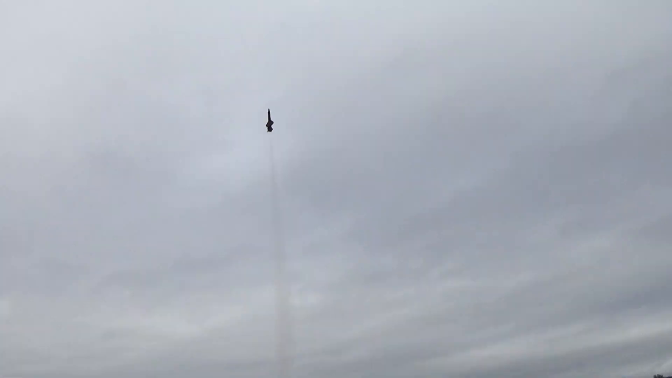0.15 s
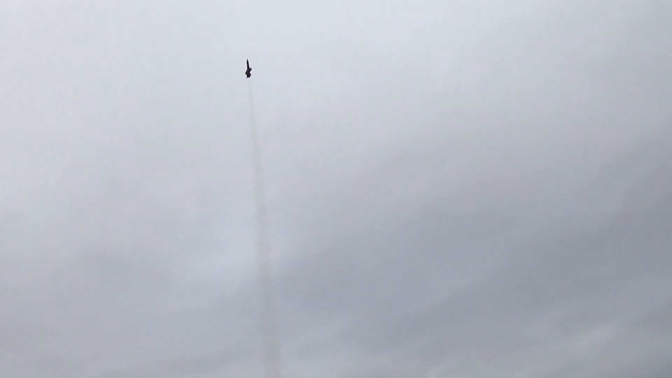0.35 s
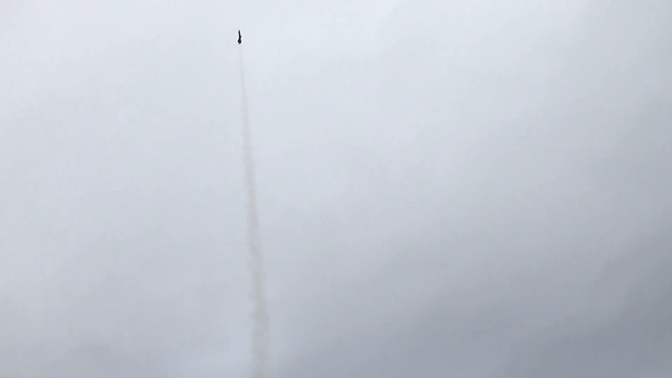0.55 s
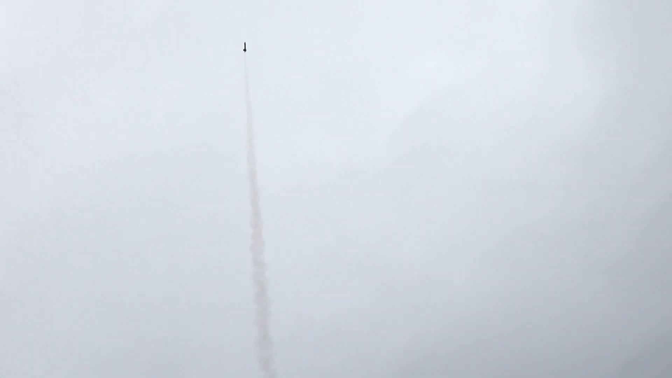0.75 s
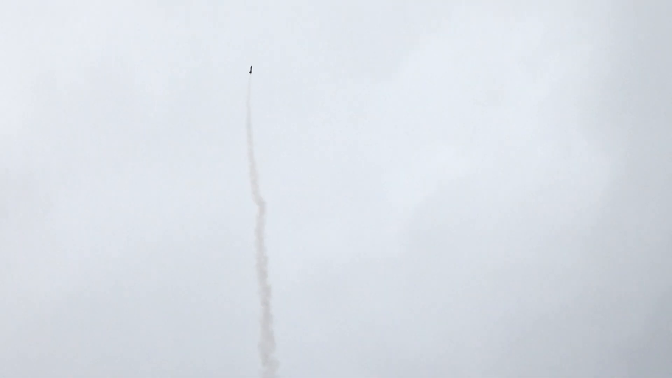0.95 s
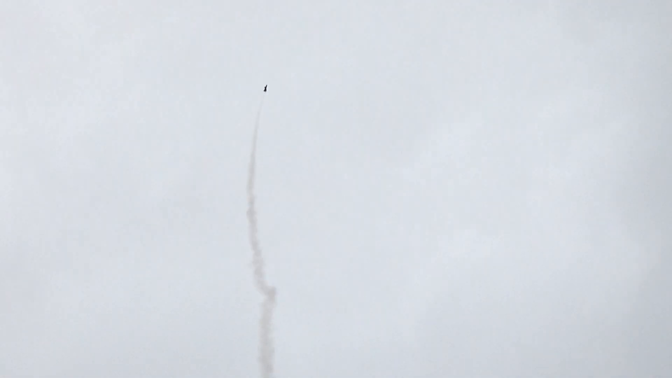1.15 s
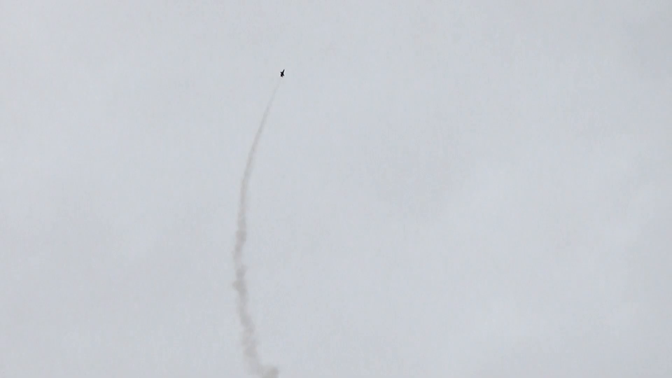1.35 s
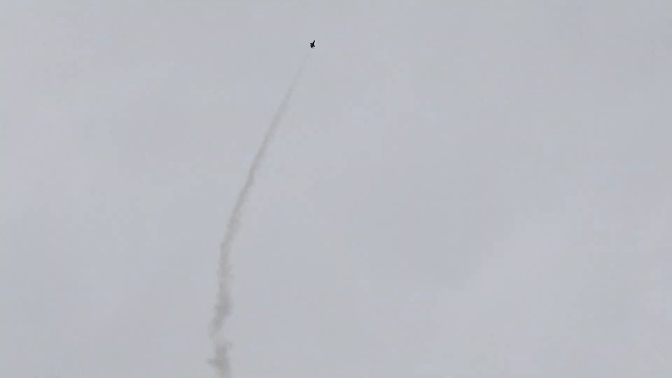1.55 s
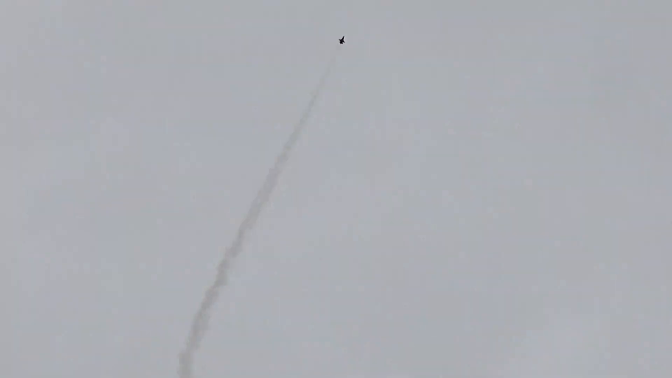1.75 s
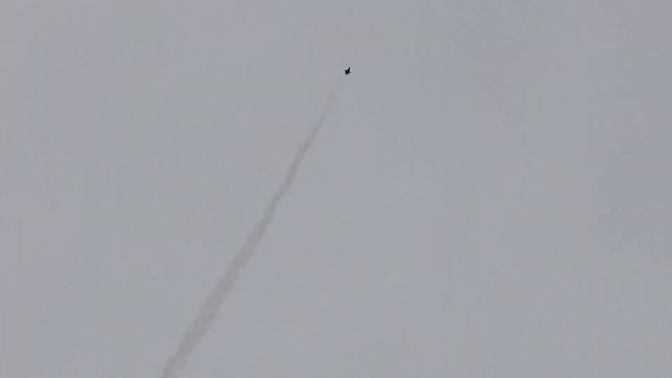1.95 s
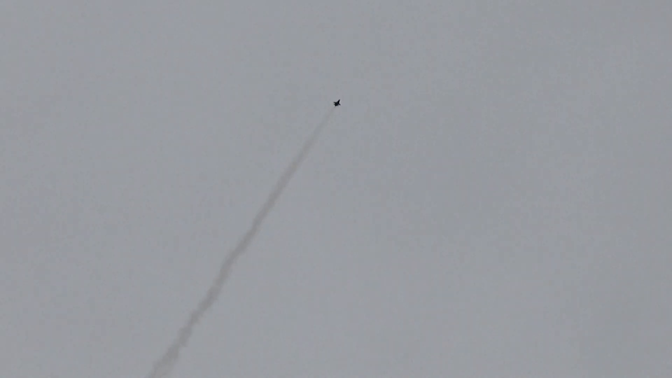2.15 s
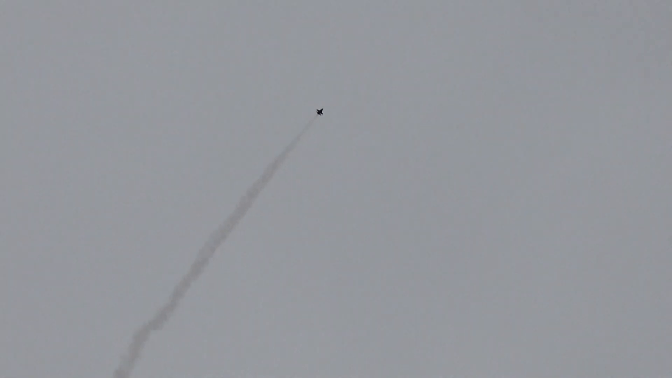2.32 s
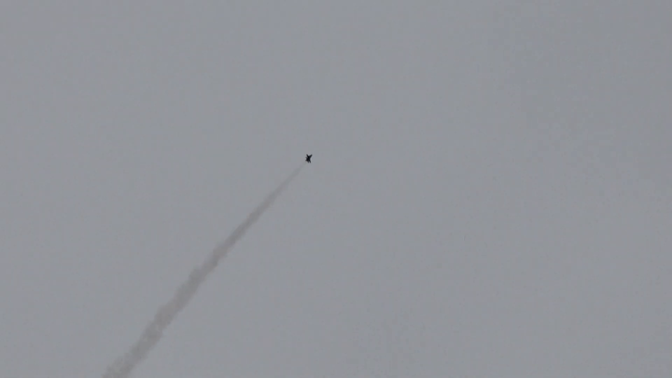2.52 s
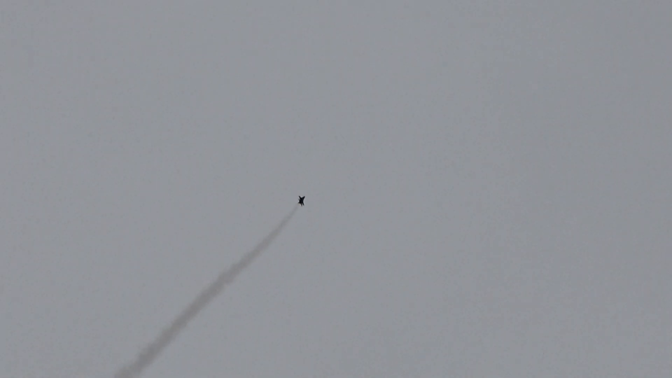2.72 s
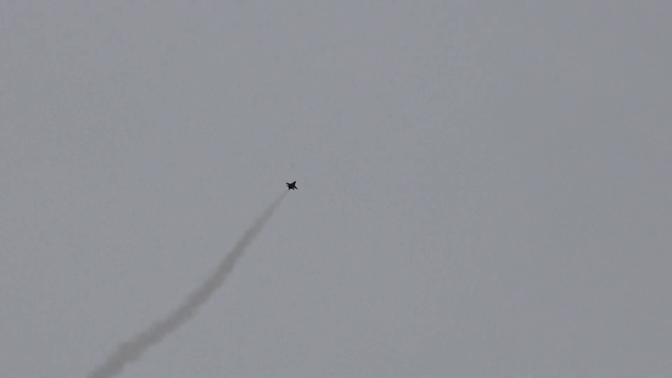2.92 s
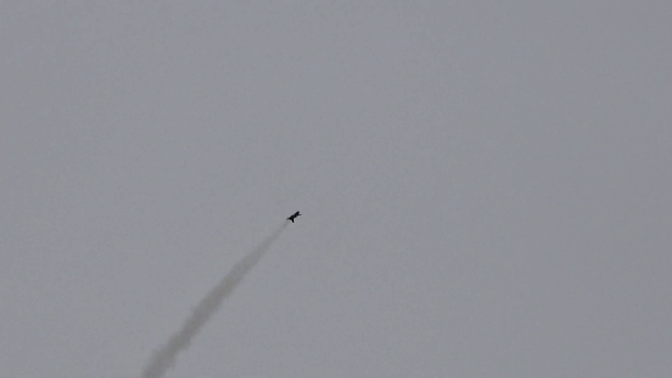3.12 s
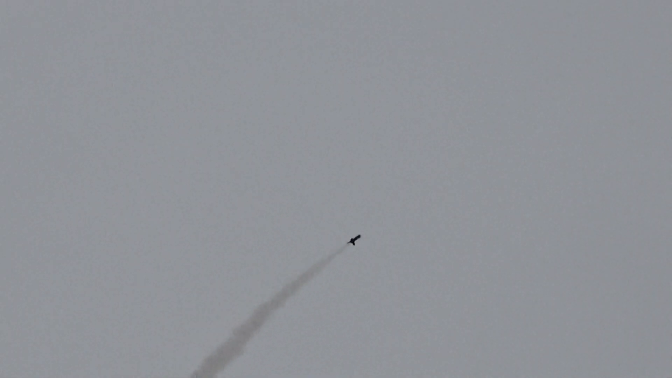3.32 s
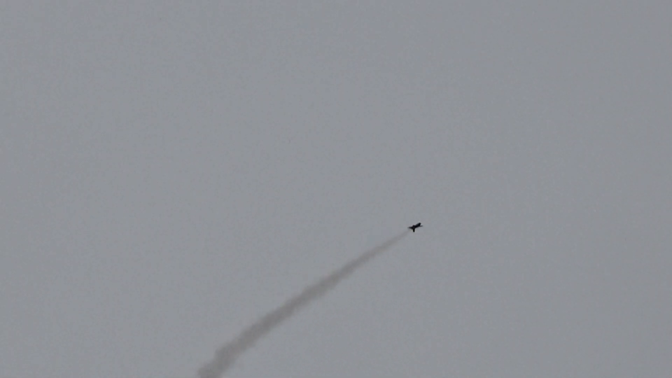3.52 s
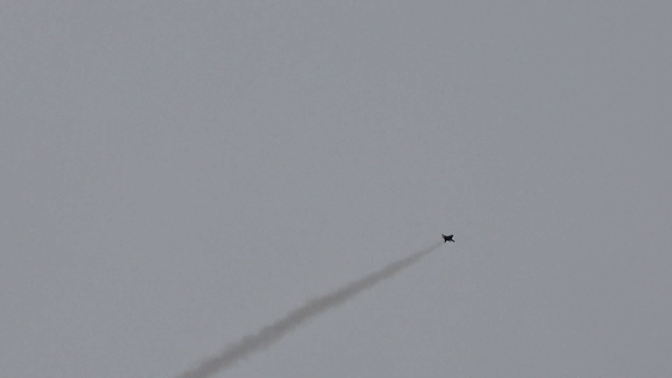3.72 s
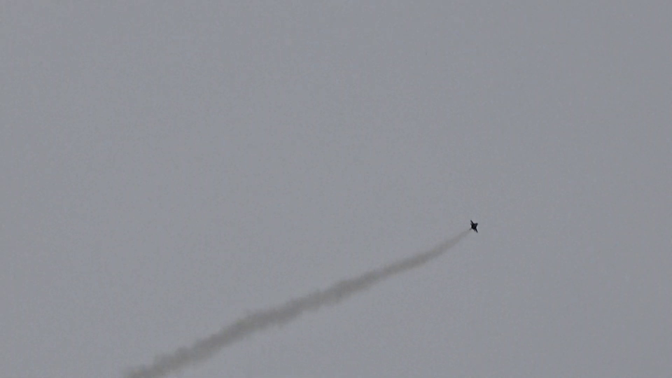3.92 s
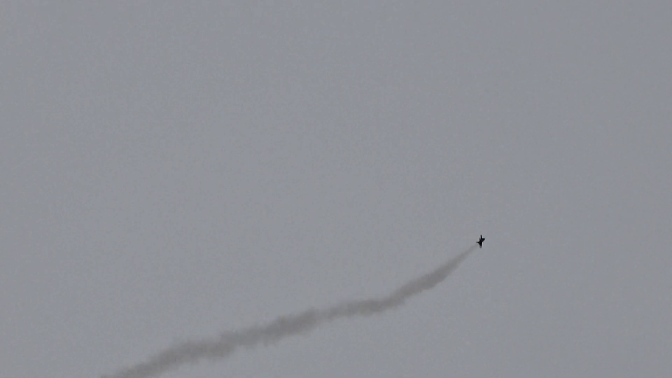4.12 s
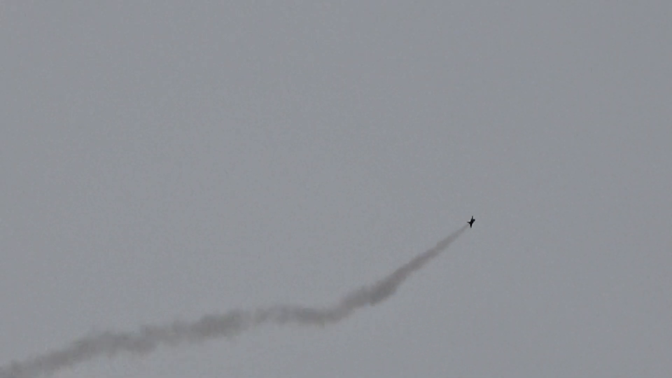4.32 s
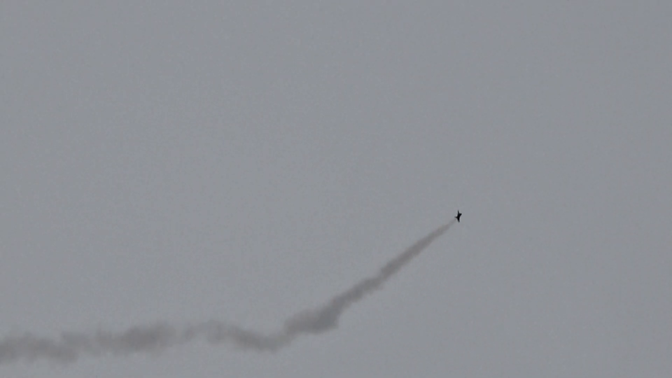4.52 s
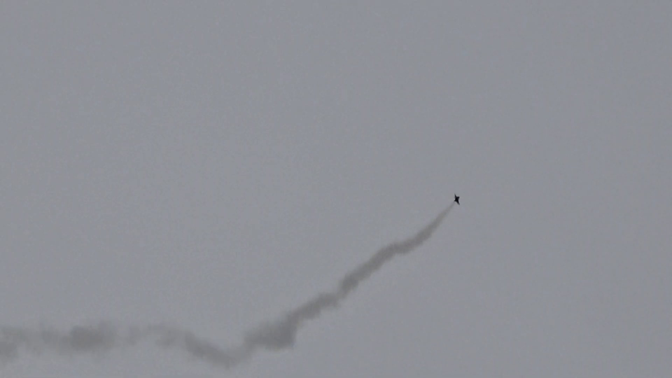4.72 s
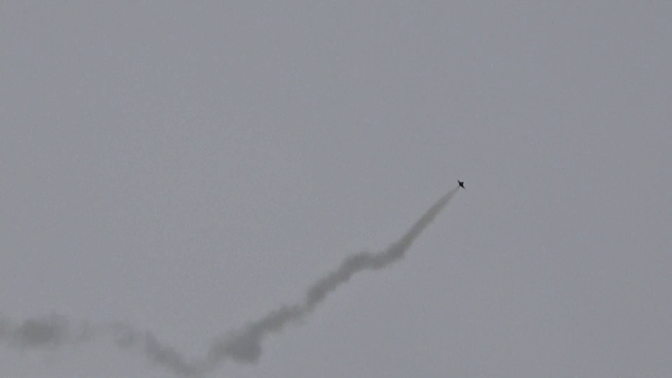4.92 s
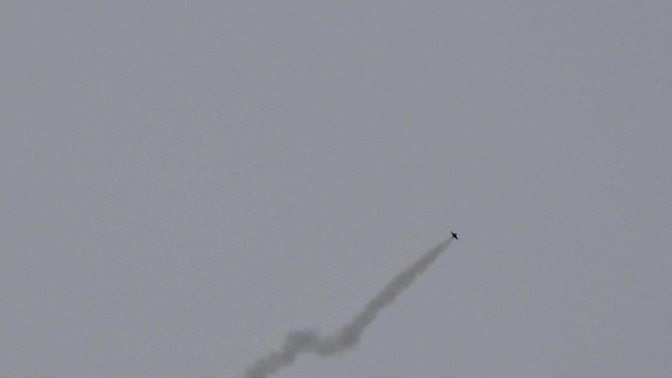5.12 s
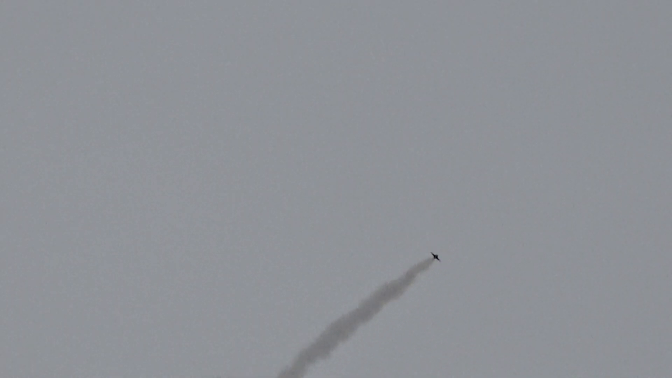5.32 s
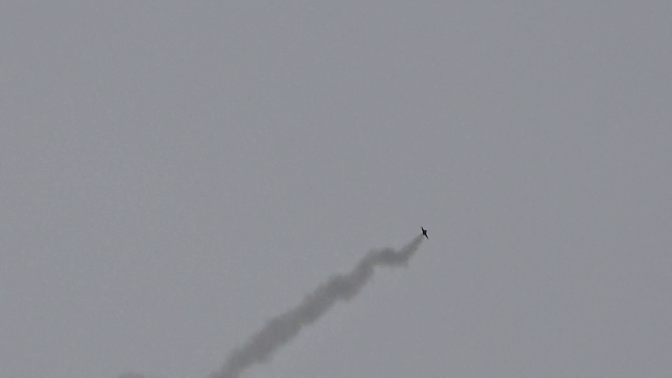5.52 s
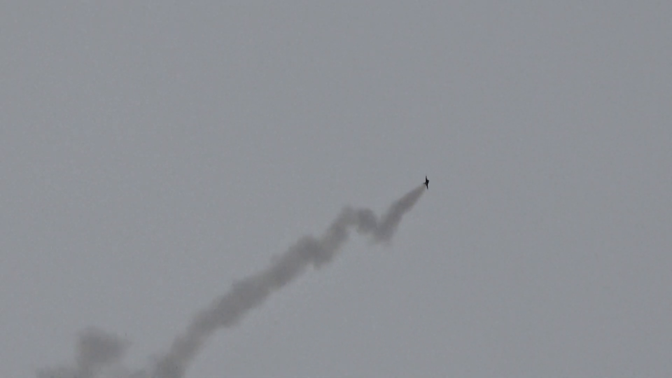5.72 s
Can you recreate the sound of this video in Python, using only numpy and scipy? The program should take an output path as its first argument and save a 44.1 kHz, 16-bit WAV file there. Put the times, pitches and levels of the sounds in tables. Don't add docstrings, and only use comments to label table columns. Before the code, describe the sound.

Throughout about 5.9 seconds, a small solid-fuel rocket motor hisses without pause as a winged model climbs away outdoors. At 0-1 s the hiss is bright, thin and sandy, with a close ground echo giving a slightly hollow, sliding tone. Sharp, dry crackles cluster around 1.3-1.7 s. From about 2.2 s the treble begins to flutter in brief dips as the airframe rolls; a very faint distant gear whine near 300 Hz swells and peaks around 2.3 s, nearly buried. At 2.57 s a single tiny, dry wooden knock sounds close to the microphones. From 3 to 5.9 s the jet becomes darker, rougher and fuller rather than fading, with softer pops and deeper swishing, phaser-like notches, strongest after 4.6 s. A faint low engine idle and field rumble gradually rise beneath. The stereo is mostly centred, with diffuse scattered hiss at the sides. It ends with the motor still burning.

```python
import sys
import numpy as np
from scipy import signal
from scipy.fft import rfft, irfft
from scipy.io import wavfile
from scipy.ndimage import uniform_filter1d

SR = 44100
rng = np.random.default_rng(int(sys.argv[2]) if len(sys.argv) > 2 else 0)


def rack_gain(trim_db):
    fader = np.asarray(trim_db, float)
    return 10 ** (fader / 20)


def store_pcm(level_fs):
    pcm = np.round(np.clip(level_fs, -1, 1) * 32767).astype(np.int16)
    wavfile.write(sys.argv[1], SR, np.atleast_2d(pcm).T)


N = 258237
TIME = np.arange(N) / SR

# time in seconds, background level in dB, diffuse share of
# the jet in dB, strength of the sideways lean (0-1).
GAIN = [(0.0, -84, -11, 0.33), (0.33, -84, -11.5, 0.46), (0.65, -78, -14, 0), (2.2, -71, -15, 0.22),
        (2.49, -68, -13, 0.06), (2.67, -70.5, -15, 0.16), (4.4, -61.5, -12, 0.3),
        (4.78, -59.5, -11.5, 0.27), (5.24, -60, -12, 0.25), (5.86, -56.5, -11.5, 0.32)]


def rms_one(x):
    return x / np.sqrt(np.mean(x ** 2) + 1e-20)


def in_time(rows, s):
    at, *columns = np.transpose(rows)
    return [np.interp(s, at, column) for column in columns]


def at_hz(points, hz):
    table_hz, value = np.transpose(points)
    return np.interp(np.log(hz + 1), np.log(table_hz + 1), value)


def shape(x, gain):
    frame = 512
    overlap = frame * 3 // 4
    hz, s, frames = signal.stft(x, SR, nperseg=frame, noverlap=overlap)
    return signal.istft(frames * gain(hz[:, None], s[None]), SR, nperseg=frame, noverlap=overlap)[1][:N]


def colour(x, points):
    gain = rack_gain(at_hz(points, np.fft.rfftfreq(N, 1 / SR)))
    return rms_one(irfft(rfft(x) * gain, N))


def band(x, low_hz, high_hz, order):
    return signal.sosfilt(signal.butter(order, [low_hz, high_hz], "band", fs=SR, output="sos"), x)


def drift(size, steps, rows):
    x = rng.standard_normal(size)
    for _ in range(2):
        x = uniform_filter1d(x, steps, axis=1)
        x = uniform_filter1d(x, rows, axis=0)
    return rms_one(x)


def field_rumble():
    # frequency in Hz, level in dB per Hz.
    field = [(30, -30), (60, -12), (100, 0), (200, 0), (300, -1), (600, 7.5), (1500, 0.5), (4000, -29),
             (9000, -32), (16000, -32)]
    return colour(rng.standard_normal(N), field)


def wide_rumble():
    level_db = in_time(GAIN, TIME)[0] - 22
    return rack_gain(level_db) * rms_one(band(rng.standard_normal(N), 180, 600, order=2))


def idling_engine(wobble):
    # multiple of the turning rate, level in dB.
    orders = [(1, -35), (2, -29), (3, -32), (4, 5), (5, -14), (6, -17), (7, -2), (8, 6), (9, -8), (10, -19),
              (11, -10), (12, -39)]
    idle_hz = 19.58
    turns = 2 * np.pi * idle_hz * TIME + 0.02 * wobble
    starts = rng.uniform(0, 2 * np.pi, len(orders))
    return rms_one(sum(rack_gain(db) * np.sin(k * turns + p) for (k, db), p in zip(orders, starts)))


def gear_whine(wobble):
    # time in seconds, pitch in Hz, level in dB.
    whine = [(.9, 285, -88), (1.15, 297, -74.5), (1.6, 315, -87), (2.05, 330, -78), (2.3, 340, -68),
             (2.45, 328, -76), (2.6, 320, -97)]
    hz, level_db = in_time(whine, TIME)
    return rack_gain(level_db + 4.0 + 3.0 * wobble) * np.sin(2 * np.pi * np.cumsum(hz) / SR)


def background():
    level_db = in_time(GAIN, TIME)[0]
    wobble = np.interp(TIME, np.linspace(0, TIME[-1], 60), drift((1, 60), steps=3, rows=1)[0])
    steady = rack_gain(-3.0) * idling_engine(wobble)
    steady += rack_gain(6.5) * field_rumble()
    steady += rack_gain(-10) * rng.standard_normal(N)
    return rack_gain(level_db) * steady + gear_whine(wobble)


def knock():
    # mode in Hz, level in dB, time to fall 60 dB in seconds.
    modes = [
        (670, -16, 0.024),
        (920, -15, .03),
        (1360, 3.5, 0.02),
        (1630, 1.5, 0.017),
    ]
    knock_s, level_db = 2.5705, -29.5
    age = np.maximum(TIME - knock_s, 0)
    rings = np.array([rack_gain(db - 60 * age / t60) * np.sin(2 * np.pi * hz * age) for hz, db, t60 in modes])
    port_gain = rack_gain(level_db + rng.normal(0, 1.7, (2, len(modes))))
    return band(port_gain @ rings, 640, 4000, order=3)


def echoes(x):
    # time in seconds, delay in ms, level in dB.
    ground = [(0, 2.5, -3), (.4, 6.6, -11), (.6, 7.1, -10), (.85, 7.9, -2), (1.15, 8.7, -1),
              (1.6, 9.15, -12.5), (2.2, 8.6, -18), (5.86, 9.9, -12.5)]
    # delay in ms, level in dB.
    near = [
        (1.698, -36),
        (5.6, -27.5),
    ]
    dull, n = band(x, 410, 4100, order=1), np.arange(N)
    delay_ms, echo_db = in_time(ground, TIME)
    out = x + rack_gain(echo_db) * np.interp(n - delay_ms * SR / 1000, n, dull, left=0)
    for ms, db in near:
        out = out + rack_gain(db) * np.interp(n - ms * SR / 1000, n, dull, left=0)
    return out


def shading(hz, s):
    # time in seconds, half length in seconds, depth in dB, shaded above this Hz,
    # slide in seconds per octave.
    shades = [(1.273, 0.037, 4.5, 6000, .01), (1.6, 0.05, 0.5, 4970, .01), (1.838, 0.049, 3, 3000, 0.00051),
              (2.033, 0.087, 3.5, 3960, 0.023), (2.274, 0.046, 7.5, 5530, 0.019),
              (2.44, 0.064, 11, 4460, 0.022), (2.84, 0.053, 3.5, 4570, 0.05),
              (3.15, 0.13, 4.5, 4500, 0.019), (3.328, 0.058, 9.5, 7500, 0.042),
              (3.537, 0.089, 5.5, 4000, 0.027), (3.704, 0.063, 11, 6000, 0.0052),
              (3.974, 0.085, 8, 6000, 0.032), (4.088, 0.085, 5, 2480, 0.018),
              (4.387, 0.12, 7, 3700, -0.028), (4.45, 0.042, 8, 10000, .01), (4.705, 0.081, 17, 7800, 0.036),
              (5.0, .045, 3, 9300, 0.034), (5.056, 0.089, 9.5, 4200, -0.037),
              (5.084, .03, 10, 10500, -0.013), (5.12, 0.082, 9, 2920, 0.064), (5.23, .03, -5, 10100, .01),
              (5.317, 0.029, 12, 9000, .01), (5.61, 0.18, 7.5, 3870, -0.077),
              (5.726, 0.081, 5.5, 4500, .07)]
    ragged = 0.25
    loss = 0
    for at, half_s, depth_db, edge_hz, slide in shades:
        late = s - at - slide * np.log2(np.maximum(hz / edge_hz, 1))
        loss = loss + depth_db * np.exp(-(late / half_s) ** 2) / (1 + (edge_hz / (hz + 1)) ** 6)
    return loss * (1 + ragged * drift(loss.shape, steps=8, rows=10))


def roll_notch(s):
    # time in seconds, notch in Hz, echo share (0-1), half length in seconds,
    # notch climb in octaves per second.
    rolls = [(2.28, 9000, .4, .04, 8), (2.46, 7000, .6, .045, 9), (2.88, 7000, .35, .05, 9),
             (3.72, 7900, .5, .06, 1), (4.67, 6300, .6, .05, 1), (4.8, 5900, .45, .05, 0),
             (4.98, 6600, .7, .08, -4.5), (5.2, 6200, .8, .09, 1.5), (5.64, 5100, .85, .07, .5),
             (5.77, 6000, .45, .08, 2)]
    at, centre_hz, share, half_s, climb = np.transpose(rolls)[:, :, None]
    late = np.clip((s[0] - at) / half_s, -2, 2)
    nearest = np.argmin(np.abs(s[0] - at) / half_s, axis=0), np.arange(s.size)
    notch_hz = centre_hz * 2 ** (climb * late * half_s)
    return notch_hz[nearest], (share * np.exp(-late ** 4))[nearest]


def roll_echo(hz, s):
    notch_hz, share = roll_notch(s)
    share = np.clip(share, 0, .95) / (1 + (0.8 * notch_hz / (hz + 1)) ** 8)
    share = share / (1 + (hz / notch_hz / 1.6) ** 6)
    wander = 0.8 * drift((len(hz), s.size), steps=10, rows=20)
    copy = share * np.exp(5j * np.pi * hz / notch_hz + 1j * wander)
    return np.abs(1 + copy) / np.sqrt(1 + share ** 2)


def jet_gain(hz, s):
    # frequency in Hz, level in dB per Hz.
    jet_colour = [(150, -60), (250, -35.5), (600, -19.5), (1250, -11), (2020, -6), (2920, -0.5),
                  (4090, 0.5), (5510, 1), (6240, -0.5), (7300, 2), (8250, 1), (9800, 3), (12000, -9),
                  (15500, -28.5)]
    # time in seconds, jet level in dB, brightness left by the air path in dB per kHz, nozzle aimed at
    flight = [(0, -28.5, 1.9358, 0.06), (.4, -29.5, 2, 0), (.62, -26, 1.5, 0.7), (.9, -25, 1.19, 1),
              (1.17, -26.5, 1.38, 0.8), (1.5, -25, 0.75, 0.68), (1.93, -29, 0.84, 1),
              (2.2, -26, 0.07, 0.53), (2.62, -23.5, 0.13, .3), (3.0, -22.5, -0.41, 0.44),
              (3.44, -21, -0.56, 0.53), (3.85, -23, -0.74, 0.52), (4.24, -20.5, -0.99, 0.87),
              (4.57, -19.5, -1.85, .1), (4.88, -17.5, -1.82, -.4), (5.14, -18.5, -2.0, 0.18),
              (5.42, -17.5, -2.0, 0.6), (5.86, -16, -3.5, 0)]
    knee_hz = 11240
    level_db, bright, aim = in_time(flight, s)
    beam = 4.5 * np.exp(-(np.log2((hz + 1) / 5400) / 0.91) ** 2)
    bend = level_db + bright * np.minimum(hz, knee_hz) / 1000 + aim * beam - shading(hz, s)
    far = np.clip(hz / knee_hz - 1, 0, 1) * (8.5 + 7.2 * bright)
    scatter = np.clip(hz / 9000, .2, 1.3)
    flicker = 1.1 * drift((len(hz), s.size), steps=9, rows=16)
    flicker = flicker + 0.5 * drift((1, s.size), steps=4, rows=1)
    return rack_gain(at_hz(jet_colour, hz) + bend + far + scatter * flicker) * roll_echo(hz, s)


def scattered_jet():
    # frequency in Hz, side level against mid in dB.
    diffuse = [(150, -30), (330, -23), (770, -11), (1240, -9), (1700, -13.5), (2210, -8.5), (2630, -17),
               (3300, -10.5), (4200, -18), (5900, -21), (7160, -17), (7960, -19), (8840, -17.5),
               (11000, -28.5)]

    def spread(hz, s):
        return jet_gain(hz, s) * rack_gain(at_hz(diffuse, hz) + 11.5 + in_time(GAIN, s)[1])

    return shape(rng.standard_normal(N), spread)


def turbulence():
    sizes = rack_gain(5.3 * np.minimum(rng.exponential(1, N), 4))
    clicks = sizes * (rng.random(N) < 250 / SR)
    dull = signal.filtfilt([.35], [1, -.65], clicks - clicks.mean())
    return rng.standard_normal(N) + rack_gain(8.5) * dull


def shocks():
    # time in seconds, peak in dB, pulse centre in Hz.
    strong = [(.6566, -14, 4300), (.915, -13, 4200), (1.3141, -14, 4100), (1.3206, -13, 4000),
              (1.4486, -11, 3700), (1.4551, -13, 4000), (1.4635, -13, 3300), (1.4673, -12, 3600),
              (1.5092, -12, 4200), (1.6323, -10, 3500), (1.6334, -13, 2100), (1.6424, -13, 4400),
              (1.7385, -13, 3700), (2.0912, -16, 3800), (2.2507, -14, 3700), (2.7736, -17, 2500),
              (3.1239, -13, 3300), (3.1399, -16, 2800), (3.2659, -17, 3500), (3.8635, -15, 3400),
              (4.1888, -15, 3600), (4.4175, -18, 3100), (4.5912, -12.5, 2500), (4.6197, -15, 2600),
              (4.9618, -19, 2900), (5.2024, -14, 2400), (5.3172, -16, 3000), (5.4139, -17, 2600),
              (5.5624, -14, 2400), (5.8076, -19, 2900)]
    when, size, pitch = rng.random((45, 3)).T
    when = .1 + when * (TIME[-1] - .2)
    weak_db = -16.5 - 1.4 * when - 6 * (size - .5)
    weak_hz = 4700 - 350 * when + 1200 * (pitch - .5)
    out, lag = np.zeros(N), np.arange(-64, 65) / SR
    for s, peak_db, hz in [*strong, *zip(when, weak_db, weak_hz)]:
        u = np.pi * hz * lag
        body = (1 - 2 * u ** 2 - 0.25 * u) * np.exp(-u ** 2)
        tip = 1.1 * np.exp(-s / 2.1) * (1 - 8 * u ** 2) * np.exp(-4 * u ** 2)
        height = rack_gain(peak_db + 0.6) * (hz / 2600) ** 0.75
        at = round(s * SR)
        out[at - 64:at + 65] += height * (body + tip)
    return band(out, 280, 15000, order=2)


def jet():
    return echoes(shape(turbulence(), jet_gain) + shocks())


def sideways_lean(mid):
    # frequency in Hz, left against right in dB.
    lean = [(60, -3), (110, 6), (200, -4), (380, 3), (700, -4.5), (1290, -1), (2380, -1), (4400, -1.5),
            (8120, 0), (15000, 3.5)]
    return shape(mid, lambda hz, s: np.tanh(at_hz(lean, hz) * 0.24 * in_time(GAIN, s)[2]))


def scene():
    mid = jet() + background()
    side = sideways_lean(mid) + scattered_jet() + wide_rumble()
    return np.array([mid + side, mid - side]) + knock()


def roll_off(x):
    return signal.sosfilt(signal.butter(12, 15660, fs=SR, output="sos"), x)


def record(dry):
    mix = 1.169 * np.tanh(dry / 1.265)
    return roll_off(mix)


dry = scene()
out = record(dry)
store_pcm(out)
```